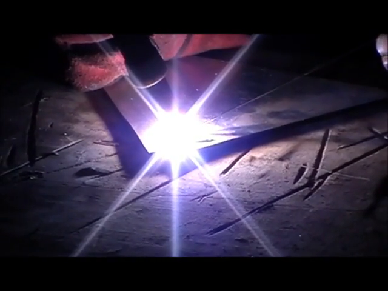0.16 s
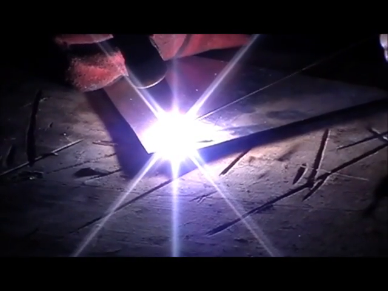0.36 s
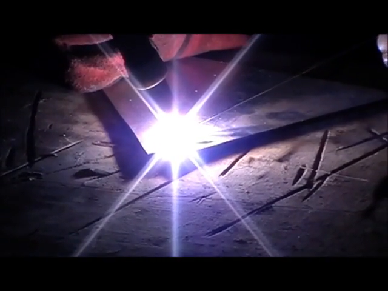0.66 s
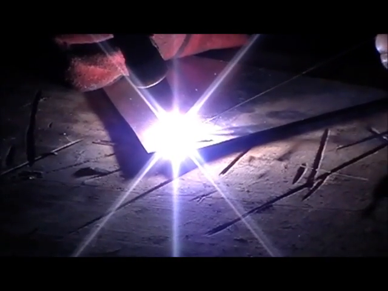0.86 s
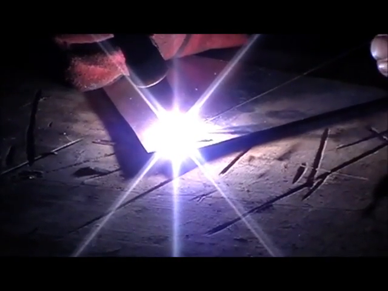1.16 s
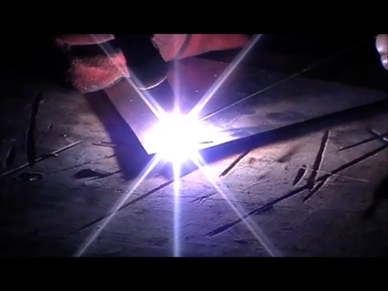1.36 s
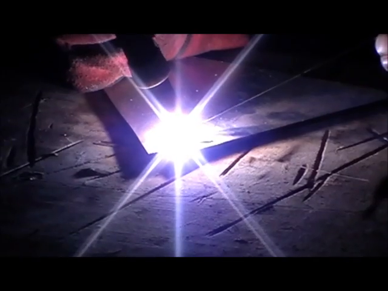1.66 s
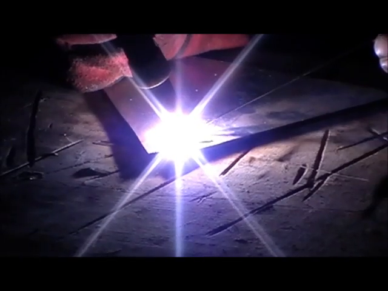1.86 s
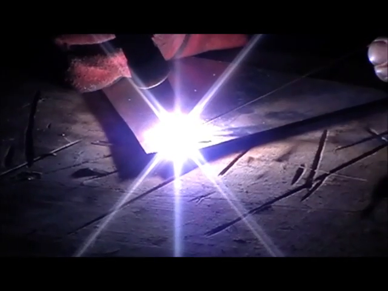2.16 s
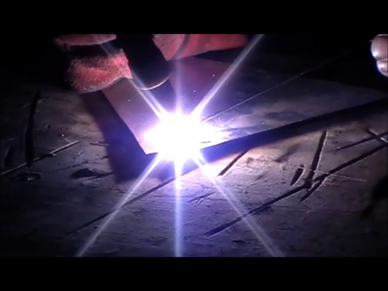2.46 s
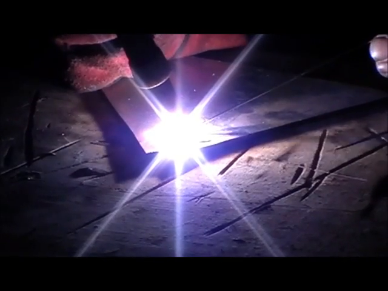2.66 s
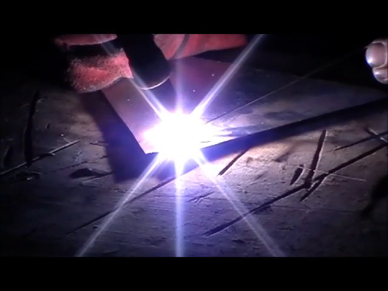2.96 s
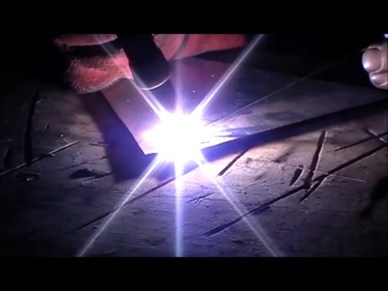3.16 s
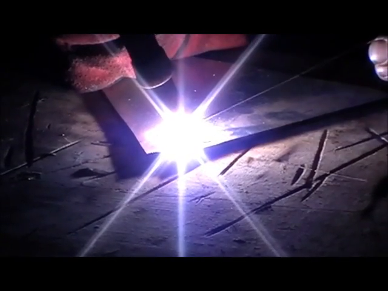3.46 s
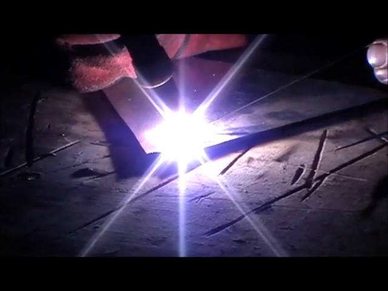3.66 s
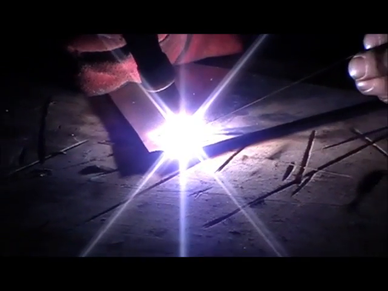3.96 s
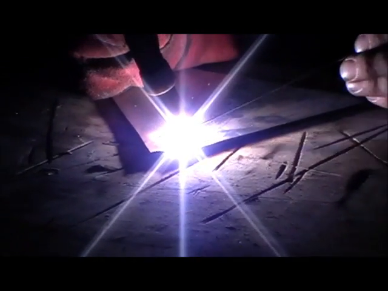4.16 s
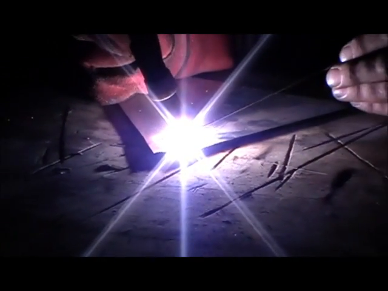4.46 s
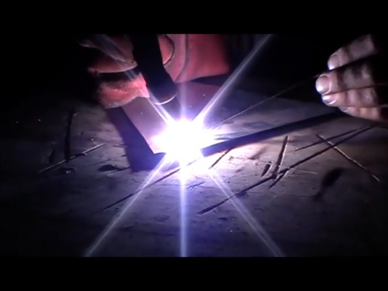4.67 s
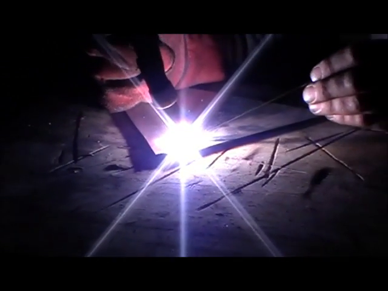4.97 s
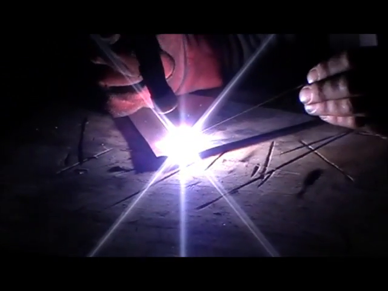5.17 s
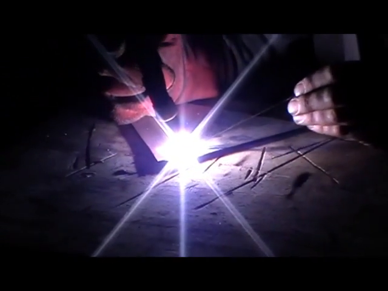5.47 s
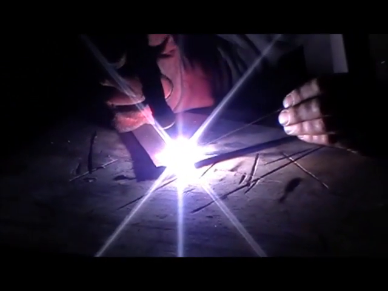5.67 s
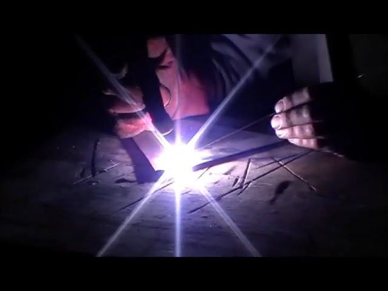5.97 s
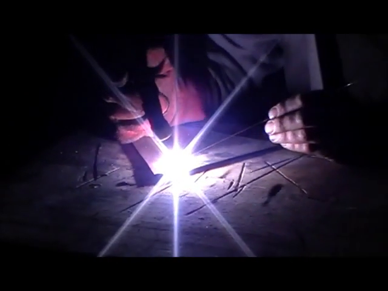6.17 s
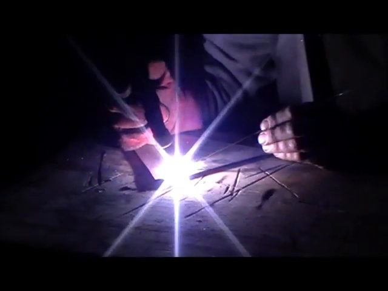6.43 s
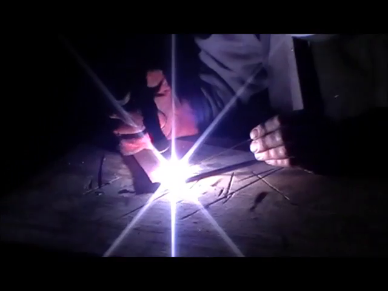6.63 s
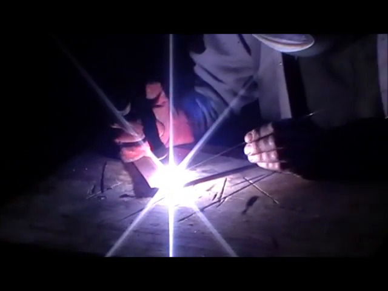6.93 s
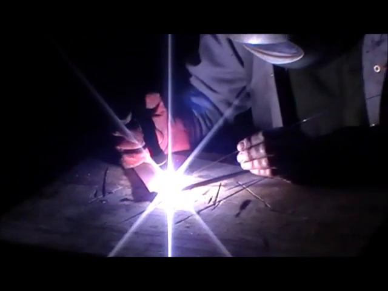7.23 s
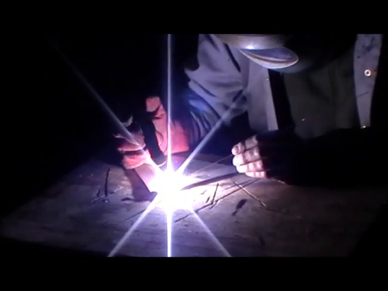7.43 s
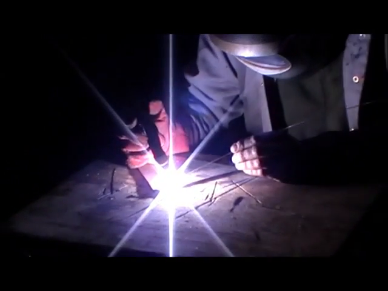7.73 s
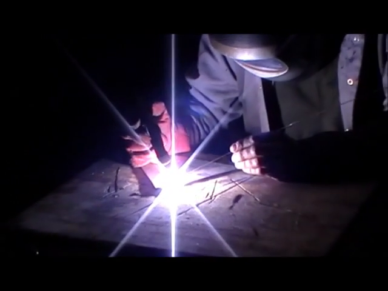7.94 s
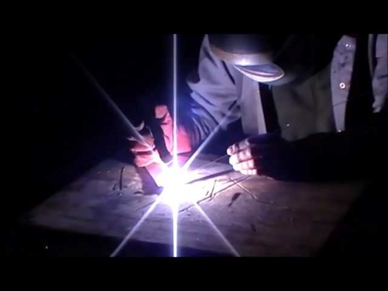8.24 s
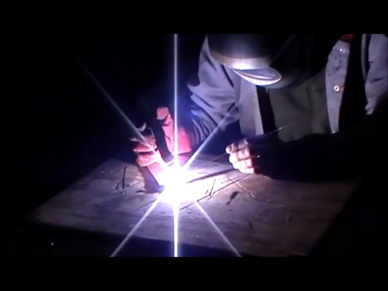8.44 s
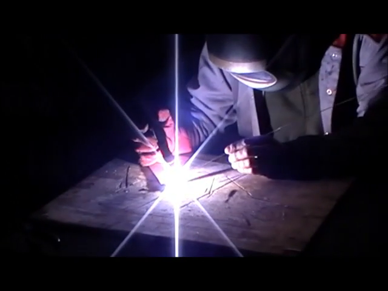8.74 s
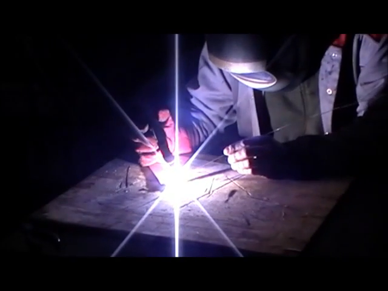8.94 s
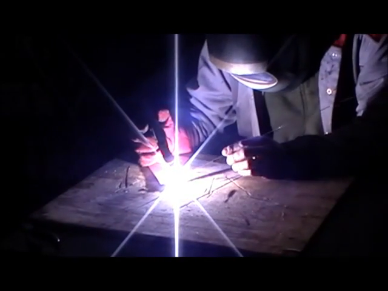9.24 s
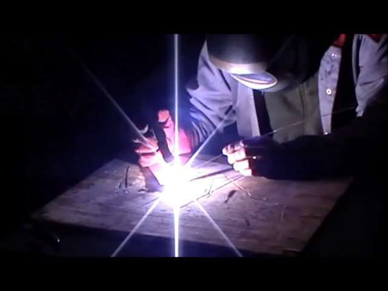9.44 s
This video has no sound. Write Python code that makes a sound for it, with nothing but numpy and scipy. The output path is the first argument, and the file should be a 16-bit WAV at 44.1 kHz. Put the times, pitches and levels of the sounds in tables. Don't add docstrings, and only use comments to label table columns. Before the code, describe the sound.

A welding arc buzzes loudly and steadily on a metal bench, harsh and crackly, with bright hiss and a soft fan hum behind.

```python
import sys
import numpy as np
from scipy import signal
from scipy.fft import rfft, irfft, next_fast_len
from scipy.io import wavfile
from scipy.ndimage import uniform_filter1d, map_coordinates

SR = 44100
rng = np.random.default_rng(int(sys.argv[2]) if len(sys.argv) > 2 else 0)


def transcribe(signal):
    frames = np.atleast_2d(signal).T
    limited = np.clip(frames, -1, 1)
    pcm = np.round(limited * 32767).astype(np.int16)
    wavfile.write(sys.argv[1], SR, pcm)


def voltage_ratio(decibels):
    exponent = np.asarray(decibels, float) / 20
    return 10 ** exponent


N = 423360

CYCLE_HZ = 75.0724
FADE_S, STRIKE_S, REVERSE_S = .005831, .006593, .012618


def along(points, hz):
    f, v = np.transpose(points)
    return np.interp(np.log(hz + 1), np.log(f + 1), v)


def unit(x):
    return x / np.sqrt(np.mean(x ** 2) + 1e-20)


def wobble(rate_hz):
    knots = rng.standard_normal(int(N * rate_hz / SR) + 4)
    return map_coordinates(knots, [np.arange(N) * rate_hz / SR])


def filtered(x, response):
    n = x.shape[-1]
    m = next_fast_len(n + SR // 2)
    return irfft(rfft(x, m) * response(np.fft.rfftfreq(m, 1 / SR)), m)[..., :n]


def pulses(times, sizes):
    at = times[:, None] * SR
    taps = np.floor(at) + np.arange(-15, 17)
    window = np.cos(np.pi * (taps - at) / 32) ** 2
    shape = np.sinc(taps - at) * window * sizes[:, None]
    return np.bincount((taps + SR).astype(int).ravel(), shape.ravel(), N + 2 * SR)[SR:SR + N]


def rung(x, modes):
    def response(f):
        return sum(g * 1j * f * w / (hz * hz - f * f + 1j * f * w) for hz, w, g in modes)
    return filtered(x, response)


def stereo(mid, side, wide_db):
    # f/Hz, level/dB
    side_curve = [(40, -36), (200, -45), (450, -21.5), (1200, -21), (1900, -5.5), (2300, -17), (3000, -17),
                  (4800, -20.5), (8600, -21), (9100, -9.5), (10500, -7), (12500, -1.5), (15500, -6)]
    side = filtered(side, lambda hz: voltage_ratio(along(side_curve, hz) + wide_db))
    return np.array([mid + side, mid - side])


def relative(rows, times):
    s, db = np.transpose(rows)
    return voltage_ratio(np.interp(times, s, db - db.mean()))


def pool(times):
    # t/s, swells done
    swells = [(-.175, -1), (.05, 0), (4.53, 20), (5.92, 26), (7.08, 31), (7.36, 32), (8.31, 36), (8.6, 37),
              (8.86, 38), (9.26, 39), (9.43, 40), (9.66, 41)]
    # t/s, slump depth/dB, mean/dB
    swell_levels = [
        (0, 3.5, 0.5),
        (5.5, 1.5, 0),
        (6.2, 1, -0.1),
        (7.2, 1.5, 0.1),
        (8.6, 4, -0.5),
        (8.8, 1.5, 0.5),
        (9.6, 1, 0),
    ]
    # t/s, loss/dB
    dips = [(1.2, 5), (1.27, 1), (3.0, 2), (4.1, 1), (5.02, 5), (6.68, 4), (6.73, 8), (7.1, 0), (7.4, 2),
            (7.56, 2), (7.66, 6), (8.44, 4), (8.65, 3), (9.29, 5)]
    dip_s = 0.012
    share = np.interp(times, *np.transpose(swells)) % 1
    s, depth_db, mean_db = np.transpose(swell_levels)
    shape = np.interp(share, [0, 0.26, 0.52, 1], [0.51, -0.63, 0.084, .4])
    swell_db = shape * np.interp(times, s, depth_db)
    choke_db = sum(db * np.exp(-((times - at) / dip_s) ** 2) for at, db in dips)
    return voltage_ratio(swell_db - choke_db + np.interp(times, s, mean_db))


def edge(times, sizes, modes, flicker=1):
    # delay/ms, signed strength
    near = [(.2, -.14), (.523, -.34), (.702, -.23), (1.09, -.08), (1.68, -.12)]
    # t/s, strength, share closer
    travel = [
        (0, 0.63, -0.0047),
        (3.5, 0.54, 0.00016),
        (6, 0.54, 0.0071),
        (9.6, 0.68, 0.023),
    ]
    s, strength, closer = np.transpose(travel)
    strength = flicker * np.interp(times, s, strength)
    closer = np.interp(times, s, closer)
    copies = sum(pulses(times + ms * (1 - closer) / 1000, g * strength * sizes) for ms, g in near)
    return rung(pulses(times, sizes) + copies, modes)


def workshop(x):
    # f/Hz, t60/s
    decay = [(300, 0.58), (2000, 0.21), (8000, 0.16), (15000, 0.52)]
    # f/Hz, level/dB
    room_curve = [(300, -1.5), (1500, 8), (2500, -3), (4000, 1.5), (5500, 2), (7000, -7.5), (12000, -1.5),
                  (15000, -1.5)]
    hz, t, z = signal.stft(rng.standard_normal((2, SR // 2)), SR, nperseg=256)
    t60_s = along(decay, hz)[:, None]
    z = z * voltage_ratio(-60 * t / t60_s) / np.sqrt(t60_s)
    tail = signal.istft(z, SR, nperseg=256)[1]
    tail = np.pad(tail / np.linalg.norm(tail[0]), ((0, 0), (70, 0)))
    wet = signal.fftconvolve(x[:, None], tail[None], axes=2)[..., :x.shape[1]]
    return x + filtered(wet[:, 0], lambda f: voltage_ratio(along(room_curve, f))), wet[:, 1]


def standing(buzz):
    # cycle multiple, level/dB
    base = [(1, -78), (3, -48), (6, -44.5), (13, -39.5), (25, -39), (44, -38), (46, -50), (76, -54)]
    # cycle multiple, level/dB
    lifted = [(15, 2), (22, 3.5), (24, 2), (29, 6.5), (31, 5), (36, 6), (37, 6), (39, 3.5), (40, 3),
              (48, 2), (50, 9), (52, 4), (60, 5), (62, 7), (63, 7), (72, 11), (74, 12)]
    # cycle multiple, level/dB
    cancelled = [(2, -6), (4, -8), (5, -20), (7, -3.5), (8, -15), (9, -3), (10, -6.5), (12, -24),
                 (14, -11.5), (16, -3.5), (20, -5), (21, -5), (23, -2), (26, -15), (27, -5.5), (28, -3),
                 (30, -6), (35, -5), (38, -9), (41, -4.5), (47, -3), (51, -8), (54, -5), (57, -8), (59, -9),
                 (64, -6), (66, -7), (70, -4), (73, -4)]
    k = np.arange(1, base[-1][0] + 1)
    offset_db = {**dict(lifted), **dict(cancelled)}
    db = np.interp(k, *np.transpose(base)) + [offset_db.get(n, 0) for n in k]
    multiple = np.round(np.fft.rfftfreq(len(buzz), 1 / SR) / CYCLE_HZ).astype(int)
    level = np.sqrt(2 * np.bincount(multiple, abs(rfft(buzz)) ** 2))[k] / len(buzz)
    knots, gains = np.append(k, k[-1] + 1), np.append(voltage_ratio(db) / level, 1)
    return filtered(buzz, lambda f: np.interp(f / CYCLE_HZ, knots, gains))


def recoloured(x):
    # f/Hz, first level/dB, last level/dB
    treble_colour = [(3300, 0.5, 0), (4540, 0.5, -0.5), (5200, 3, -2), (5600, 3.5, 0.5), (6030, 2.5, -2),
                     (6800, 2.5, -0.5), (7630, 1, 4.5), (8240, -1.5, 1), (8850, 2, 5), (9500, 2, 1),
                     (13500, 0.5, 1.5), (13700, 4.5, -3), (14400, 2, 7), (15500, 3, -4)]
    hz, first_db, last_db = np.transpose(treble_colour)
    first = filtered(x, lambda f: voltage_ratio(np.interp(f, hz, first_db)))
    last = filtered(x, lambda f: voltage_ratio(np.interp(f, hz, last_db)))
    lateness = np.clip((np.arange(N) / SR - 2.5) / 6.4, 0, 1)
    return (1 - lateness) * first + lateness * last


def arc():
    # f/Hz, width/Hz, signed strength
    fade = [(1710.0, 830.0, 1.92), (9250.0, 500.0, 1.14)]
    strike = [(1350.0, 2820.0, 0.61), (5730.0, 500.0, 1.45), (7240.0, 500.0, 3.19), (7860.0, 570.0, 4.0),
              (9350.0, 500.0, 1.67), (11100.0, 570.0, 1.61), (12750.0, 500.0, -2.05),
              (12820.0, 760.0, 1.99)]
    reverse = [(2580.0, 940.0, -4.0), (6310.0, 700.0, -0.41), (8240.0, 520.0, -3.89),
               (9800.0, 500.0, -1.02), (11100.0, 520.0, -0.76), (13610.0, 930.0, 0.24)]
    sputter = [(2900.0, 2260.0, 1.06), (5310.0, 450.0, -0.86), (6860.0, 1300.0, 3.4), (7910.0, 740.0, 2.94),
               (9940.0, 470.0, -1.34), (10970.0, 450.0, 0.8), (12990.0, 450.0, 0.33)]
    # t/s, level/dB
    knock_levels = [
        (0.0, -24),
        (2.09, -23.5),
        (4.73, -22.5),
        (6.6, -23),
        (7.06, -23.5),
        (7.43, -23),
        (9.6, -24.5),
    ]
    start = np.arange(int(N / SR * CYCLE_HZ) + 1) / CYCLE_HZ
    start = start + .0024 * (start - 5.0) ** 2 / 1000
    crack = pool(start + STRIKE_S)
    knock = relative(knock_levels, start) * crack ** -0.21
    luck = rng.standard_normal((len(start), 4))

    steady = edge(start + FADE_S, knock, fade) + edge(start + REVERSE_S, knock, reverse)
    jitter_s = 4e-6 * luck[:, 0]
    steady += edge(start + STRIKE_S + jitter_s, crack ** 0.83, strike, flicker=1 + 0.22 * luck[:, 2])

    uneven = .52 * np.tanh(2.2 * (crack - 1) + .5 * luck[:, 1] + .3) - .13
    scatter = edge(start + STRIKE_S - 12e-6, uneven, sputter)
    scatter += edge(start + REVERSE_S, 0.16 * luck[:, 3], reverse)
    scatter += edge(start + STRIKE_S, 0.29 * luck[:, 0] - 0.63 * uneven, strike[:1])
    scatter += edge(start + FADE_S, .25 * uniform_filter1d(luck[:, 2], size=4), fade)

    lead = round(37 * SR / CYCLE_HZ)
    edges = np.array([steady, scatter])
    mid, side = workshop(np.hstack([edges[:, :lead], edges, edges[:, -lead:]]))
    now = slice(lead, lead + N)
    buzz = standing(mid[0])[now] + mid[1, now]
    return stereo(recoloured(buzz), side.sum(0)[now], wide_db=1.5)


def rush(spectrum, wide_db):
    noise = rng.standard_normal((2, N))
    mid, side = filtered(noise, lambda hz: voltage_ratio(along(spectrum, hz)))
    return unit(stereo(mid, side, wide_db))


def plasma():
    # f/Hz, density/(dB per Hz)
    hiss = [(2500, -37), (4300, -14.5), (5800, -8.5), (6700, 2), (7500, -3), (8100, 1.5), (9300, -3.5),
            (10200, -8.5), (13000, -17), (15000, -14), (16000, -8)]
    t = np.arange(N) / SR
    since_s = (t - STRIKE_S) % (1 / CYCLE_HZ)
    half_db = 4.5 * (since_s < REVERSE_S - STRIKE_S + .001)
    burst_db = 10 * np.exp(-(since_s / .0007) ** 2)
    flicker_db = 1.1 * wobble(25) + 0.24 * wobble(4.8)
    gain = pool(t) ** .4 * voltage_ratio(-32 + half_db + burst_db + flicker_db)
    return gain * rush(hiss, wide_db=-5.0)


def fan():
    # f/Hz, density/(dB per Hz)
    air = [(25, -22), (70, -20), (105, -13.5), (160, -9), (200, -1), (400, -4), (650, -0.5), (1200, -2.5),
           (2200, 1.5), (3200, -1.5), (3800, 0.5), (4300, -4.5), (5500, -4), (16000, -12)]
    # f/Hz, level/dB, flutter/dB
    blades = [(260.5, -43.5, 1.3), (346.6, -58, 2), (618, -55, 3), (103.6, -65, 2.5)]
    t = np.arange(N) / SR
    tones = 0
    for hz, db, flutter_db in blades:
        level = np.sqrt(2) * voltage_ratio(db + flutter_db * wobble(5))
        tones = tones + level * np.sin(2 * np.pi * hz * t + 0.8 * wobble(4))
    return voltage_ratio(-29) * rush(air, wide_db=0.0) + tones


def scene():
    return arc() + plasma() + fan()


def low_pass(x):
    return signal.sosfilt(signal.butter(12, 16200, fs=SR, output="sos"), x)


def record(dry):
    top_hz = 15815
    held = dry / (1 + abs(dry / 1.04) ** 6) ** (1 / 6)
    mix = filtered(held, lambda hz: np.clip((top_hz - hz) / 150 + .5, 0, 1) ** 2)
    return low_pass(mix)


dry = scene()
out = record(dry)
transcribe(out)
```